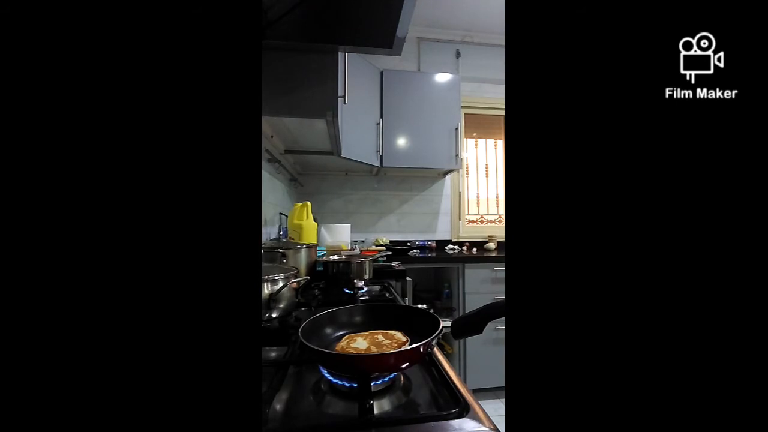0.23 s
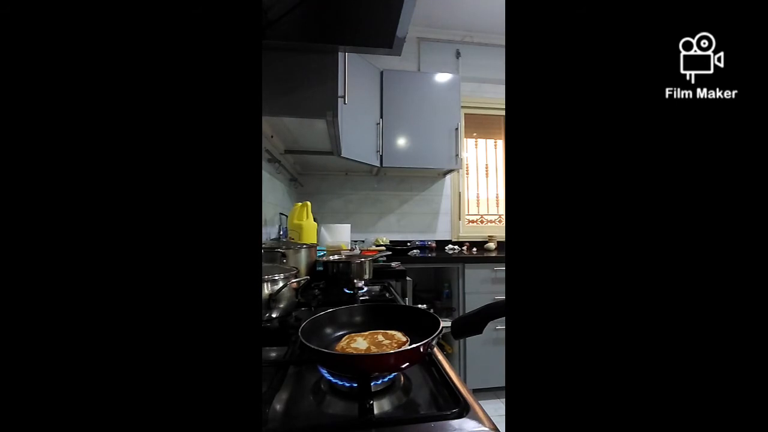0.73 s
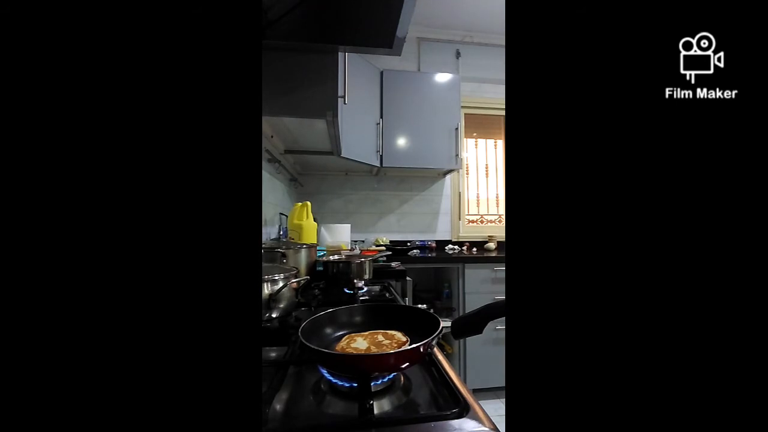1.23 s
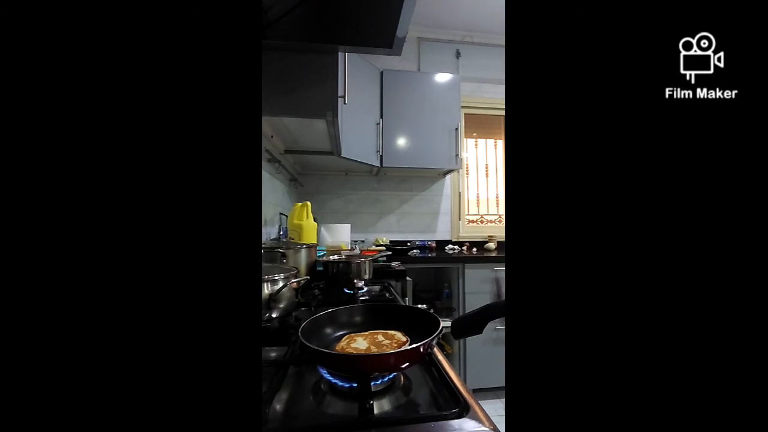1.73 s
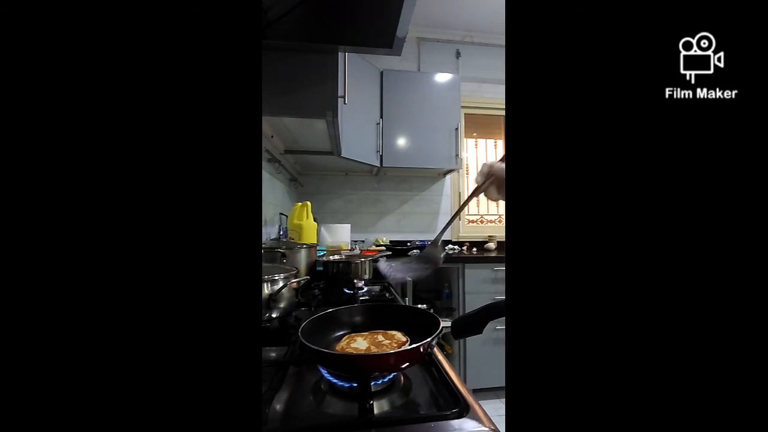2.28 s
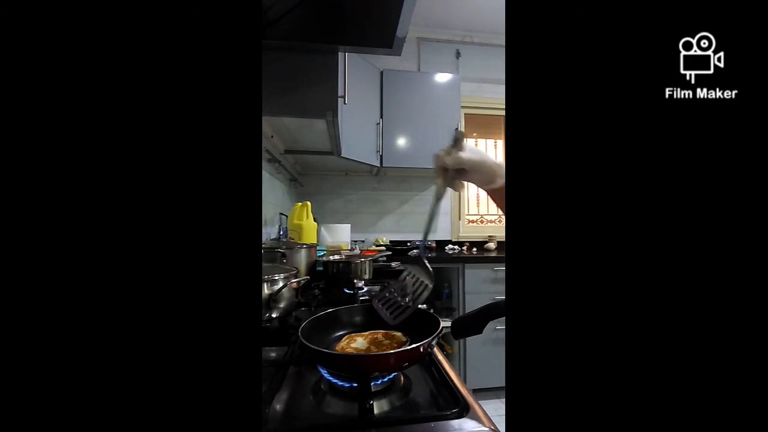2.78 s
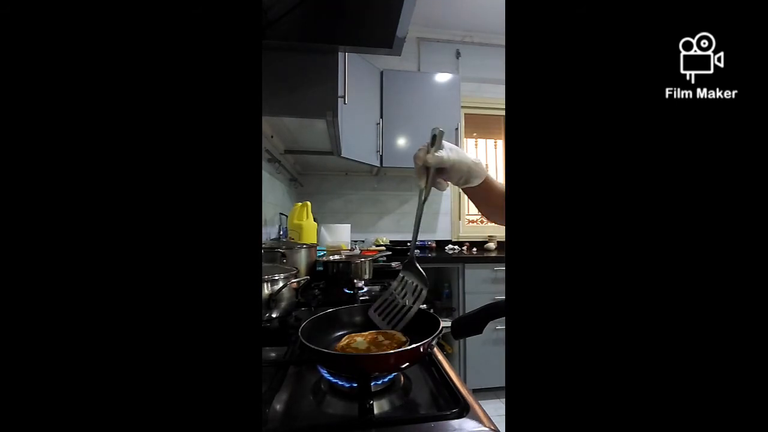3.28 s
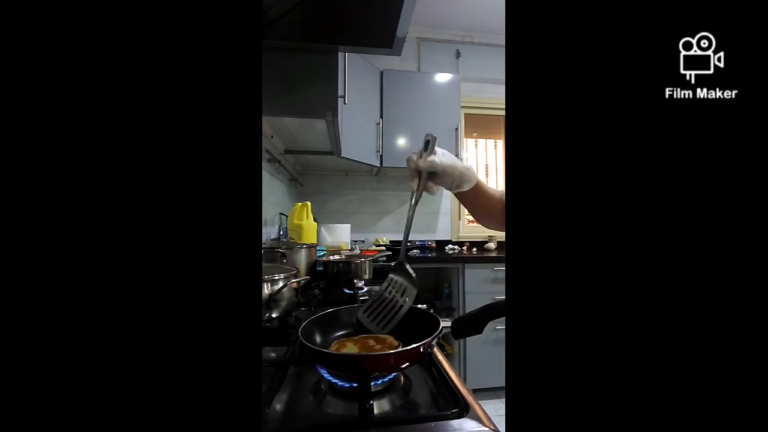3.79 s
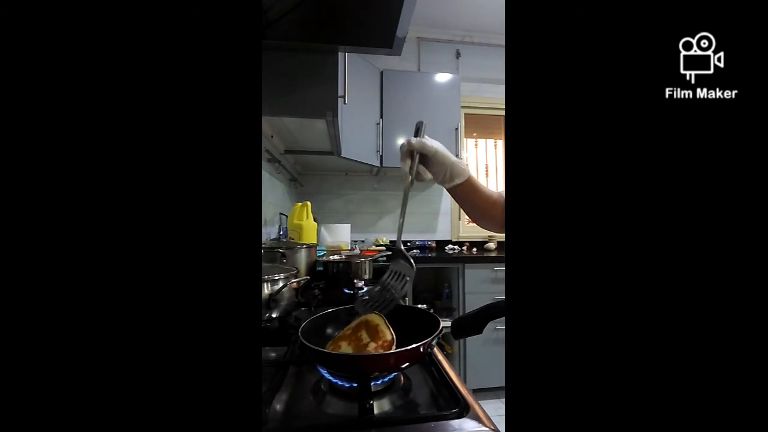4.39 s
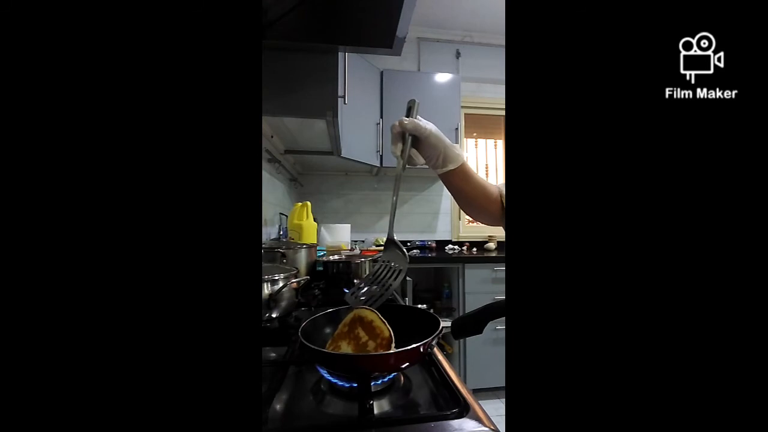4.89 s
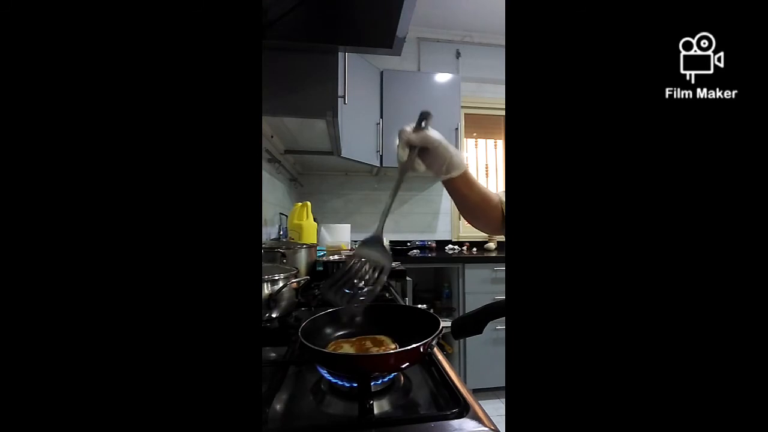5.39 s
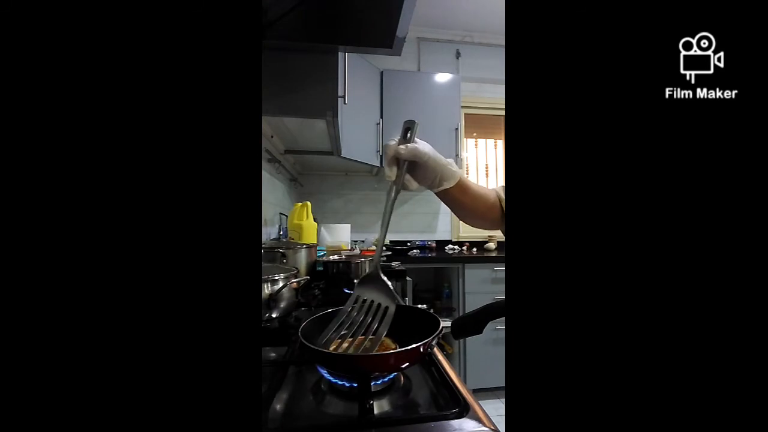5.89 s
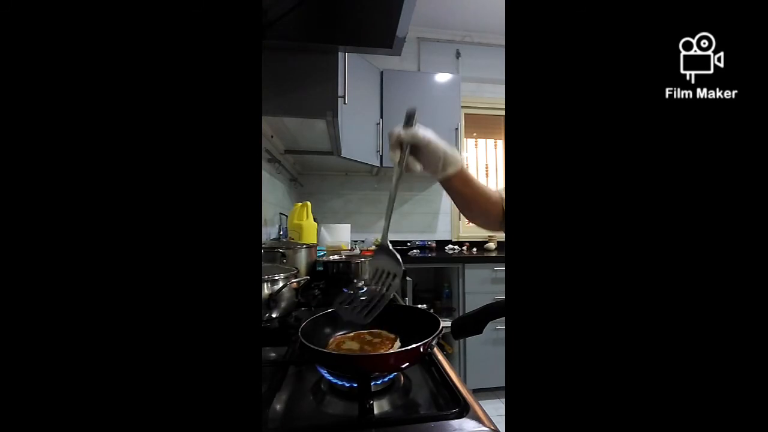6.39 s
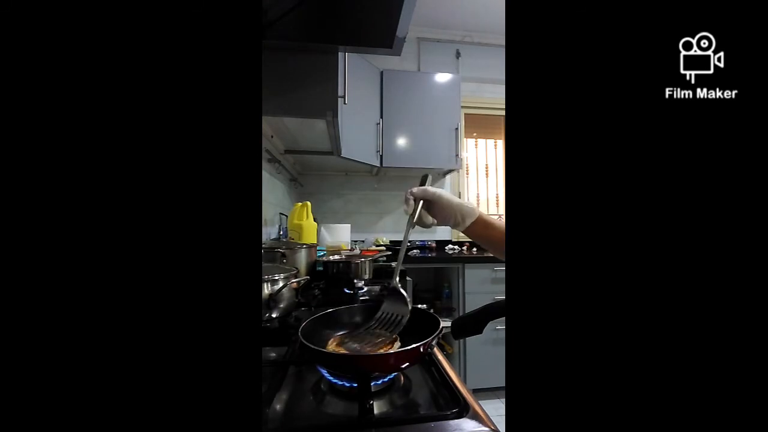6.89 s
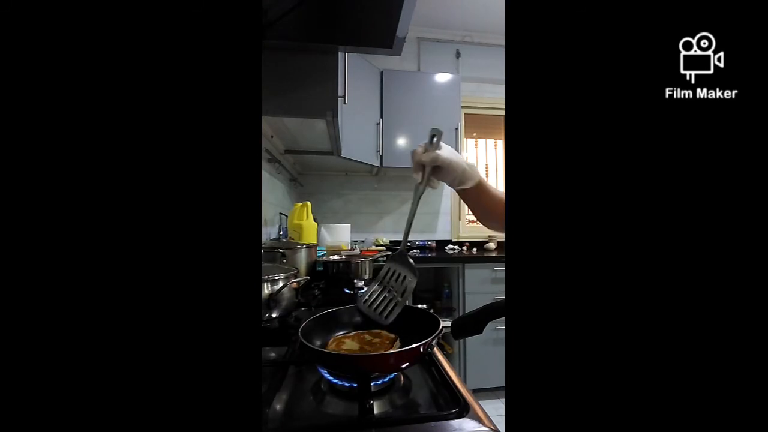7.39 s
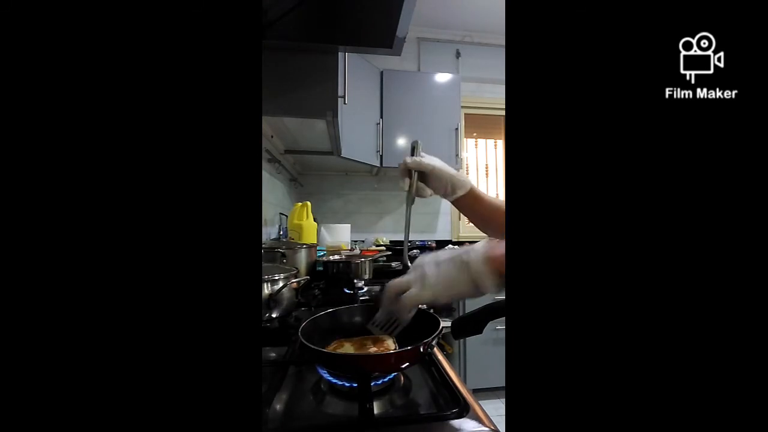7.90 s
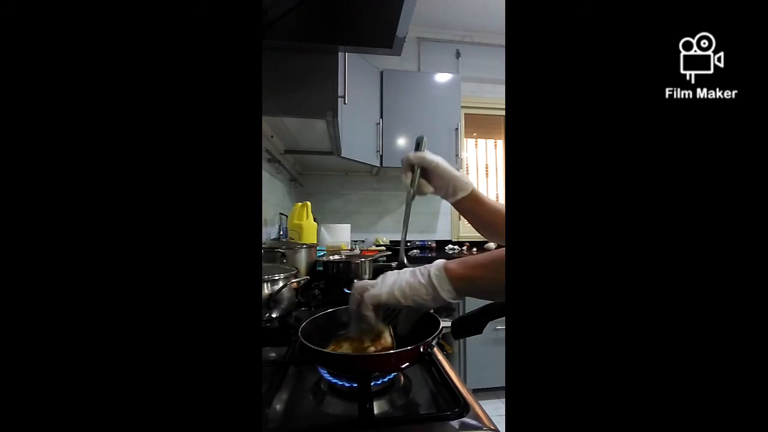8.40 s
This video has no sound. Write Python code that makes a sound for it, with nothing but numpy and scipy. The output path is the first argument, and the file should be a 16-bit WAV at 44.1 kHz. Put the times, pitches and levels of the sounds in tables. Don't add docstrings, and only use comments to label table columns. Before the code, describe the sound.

A tiny tick opens onto a steady low extractor hood roar, bass-heavy and gently gusting, with a soft airy rush and a very faint, fluctuating fat hiss. The place is a small, hard kitchen, heard close in stereo. At about 2.6 s a steel turner taps the frying pan firmly and scrapes, with lighter metallic ticks to 2.9. Light taps and a drag follow at 3.2, then a hard, quickly damped knock at 3.85 with short scrapes to 4.1. From 4.53 to 5.09 everything drops to complete silence, then the roar returns abruptly with a tiny tick and a faint scrape. A clean slap hits the pan rim at 5.9. The sizzle dips after 6.5; a barely audible tap comes at 6.9. Around 7.5 a hard knock leads into several scratchy drags, fading by 8.3, while a thin plastic glove rustles softly in squeezes until the end at 8.6.

```python
import sys
import numpy as np
from scipy import signal
from scipy.fft import rfft, irfft
from scipy.io import wavfile
from scipy.ndimage import uniform_filter1d

SR = 44100
rng = np.random.default_rng(int(sys.argv[2]) if len(sys.argv) > 2 else 0)


def elevation(decibels):
    levels = np.asarray(decibels, float)
    return 10 ** (levels / 20)


def to_wav(sig):
    pcm = np.clip(np.atleast_2d(sig), -1, 1) * 32767
    pcm = np.round(pcm).astype(np.int16)
    wavfile.write(sys.argv[1], SR, pcm.T)


N = 380583
T = np.arange(N) / SR
HZ = np.arange(N // 2 + 1) * SR / N

# frequency in Hz, width in Hz, level in dB per Hz.
DUCT_MODES = [(61.3, 12, -55.5), (90.5, 32, -57.5), (114.8, 23.7, -47), (136, 24.9, -46),
              (202.5, 11, -56.5), (253, 53, -55), (299.9, 22.6, -53.5), (336, 29, -64.5), (396.4, 52, -62),
              (423.6, 37, -59.5), (466.8, 43.3, -57.5), (500.4, 21, -60), (526, 20, -64.5),
              (579, 57, -65.5), (620.7, 16, -63.0), (654, 29, -71), (700.4, 48, -67), (794.7, 31, -67.5),
              (790, 11, -85), (1040, 4.1, -78.5), (1031, 16, -74.5), (1050, 5.2, -71.5)]
# frequency in Hz, width in Hz, level in dB per Hz.
SLOT_WHISTLES = [(1537, 100, -82), (2291, 83, -81.5), (2410, 57, -84.5), (3320, 120, -89.5),
                 (3570, 140, -88.5), (4080, 100, -96.5)]
# frequency in Hz, level in dB per Hz.
AIR_RUSH = [(25, -99), (45, -86.5), (800, -79), (1050, -77.5), (1300, -81.5), (1550, -86), (1900, -87),
            (2300, -87.5), (2800, -91.5), (3400, -93), (4100, -94), (4700, -108), (6000, -120)]
# frequency in Hz, level in dB rms.
MOTOR_BUZZ = [(200.3, -47)]
# centre in seconds, rise over the lull in dB.
GUST_SWELLS = [
    (.15, 1),
    (1.1, 6),
    (2.2, 4.5),
    (3.4, 3.5),
    (4.2, 2.5),
    (5.3, 2.5),
    (5.85, 4),
    (7.1, 4),
    (7.8, 5),
    (8.6, 2.5),
]

# frequency in Hz, level in dB.
FAT_SPECTRUM = [(3800, 1.5), (4900, 2), (5400, 1.5), (6200, 1.5), (7600, -4.5), (8200, -5), (9000, -7.5),
                (12000, -16.5), (15700, -22)]
# time in seconds, level in dB.
FAT_HEAT = [
    (0, -76.5),
    (1.5, -80),
    (2.6, -78),
    (4.5, -80.5),
    (6.2, -77.5),
    (6.6, -83.5),
    (7.3, -83),
    (8.63, -80.5),
]
# centre in seconds, rise over the simmer in dB.
FAT_SWELLS = [(.22, 3), (.41, 4.5), (.68, 6), (1.07, 5.5), (1.22, 3.5), (1.61, 4.5), (1.87, 2.5),
              (2.1, 1.5), (2.67, 5.5), (3.2, 6.5), (3.35, 3.5), (3.58, 3), (3.9, 6.5), (4.26, 4), (4.52, 5),
              (5.12, 5), (5.42, 4), (5.98, 3.5), (6.25, 0.5)]

# frequency in Hz, level in dB.
GLOVE_SPECTRUM = [(1200, -1.5), (1900, -6), (2700, -3.5), (3300, -3), (4200, -8), (5100, -11.5),
                  (6000, -10.5), (7300, -15), (8200, -16), (9300, -20.5), (13500, -27.5), (15600, -26)]
# centre in seconds, rise in dB.
GLOVE_SQUEEZES = [
    (7.65, 1),
    (7.82, 1.5),
    (7.95, 3.5),
    (8.1, 3.5),
    (8.33, 4),
    (8.62, 2),
]

# start in seconds, pan level in dB, bowl minus rim in dB, blade minus pan in dB.
TURNER_TAPS = [
    (2.564, -38.5, 6, -13),
    (2.678, -48.5, -3, 1),
    (2.848, -49, -5, 4.5),
    (3.150, -53.5, -3, -3.5),
    (3.180, -46.5, -5.5, -1.5),
    (3.729, -49, 3, -8.5),
    (3.855, -33, -1, -8),
    (6.86, -58, 3.5, -3.5),
    (7.466, -51.5, 5, -3),
    (7.548, -35, 1, -5),
]
# start in seconds, pan level in dB, bowl minus rim in dB, blade minus pan in dB.
BLADE_SLAPS = [
    (5.872, -31.5, -12, -37),
]
# start in seconds, pan level in dB, bowl minus rim in dB, blade minus pan in dB,
# contact time in seconds.
TURNER_DRAGS = [(2.572, -39.5, -1.5, -11, .035), (2.857, -61, 2, 2.5, .018), (3.191, -43, 0.5, -18.5, .03),
                (3.745, -47.5, 8.5, -19.5, .02), (3.875, -48, -9, -15, .02), (4.027, -48, -16, -22, .041),
                (5.195, -58, 1, -0.5, .033), (5.880, -37, -6, -31.5, 0.012),
                (5.905, -48, -1.5, -26.5, 0.012), (7.478, -44.5, 3, -16.5, 0.02),
                (7.558, -36, -4.5, -22.5, 0.02), (7.595, -43, 0.5, -14, .03), (7.668, -40, -3.5, -16, .088),
                (7.915, -47, 1, -9.5, .037), (8.270, -44, -11.5, -14, .015)]

# frequency in Hz, level in dB, 60 dB decay time in seconds.
BOWL_MODES = [(685, -8.5, .05), (755, -6.5, 0.09), (870, -7, 0.045), (974, 0.5, 0.058), (1107, -2, 0.035),
              (1186, -4.5, 0.011), (990, 5, 0.0033)]
# frequency in Hz, level in dB, 60 dB decay time in seconds.
RIM_MODES = [(1442, 0.5, 0.037), (1580, -0.5, 0.029), (1290, -8.5, .015), (1720, -8.5, .02),
             (1960, -7, 0.018), (1820, -2, 0.002)]
# frequency in Hz, level in dB, 60 dB decay time in seconds.
LIP_MODES = [(2040, -2, 0.013), (2390, 1.5, 0.05), (2550, 1, 0.039), (2790, -5, .015), (3280, -4, 0.022),
             (3610, -6, 0.024), (4270, -5.5, 0.018), (2680, 4, 0.0021)]
# frequency in Hz, level in dB, 60 dB decay time in seconds.
BLADE_MODES = [(5000, -4, .005), (5650, -2, .010), (5960, -3.5, .012), (6760, -4, .005), (7600, -4, .006),
               (8750, -6, .005), (10600, -10, 0.0044)]
# frequency in Hz, level in dB, 60 dB decay time in seconds.
EDGE_MODES = [(9300, -2, .002), (10800, -1, .002), (12000, 0, .002), (13600, -4, .002), (15200, -6, .002)]

# frequency in Hz, left minus right in dB.
PORT_BALANCE = [(200, 1.), (310, 4), (400, -0.5), (560, 4.5), (720, 11.5), (940, 1), (1120, 6.5), (1320, 4),
                (1700, 8.5), (2600, 5), (3500, 11), (4800, -2.5), (7000, -1), (8300, -0.5)]
# frequency in Hz, likeness from 0 to 1.
PORT_LIKENESS = [(200, 1), (350, 0.95), (480, 0.95), (650, .88), (900, 0.82), (1070, 1), (1250, 0.67),
                 (1700, .15), (2350, 0.5), (2700, 0.25), (5000, 0.18)]
# frequency in Hz, lag of the left in radians.
PORT_LAG = [(200, -0.13), (550, -0.06), (800, 1), (920, 1), (1100, 1.68), (1300, 2), (1900, 4.5),
            (2350, 7.5), (4000, -4.5)]

# its start in seconds, its end in seconds.
SILENCE_S = (4.5345, 5.091)


def on_hz(table):
    hz, value = np.transpose(table)
    return np.interp(np.log(HZ + 1), np.log(hz), value)


def on_time(table):
    return np.interp(T, *np.transpose(table))


def swells(events, width_s):
    return sum(db * np.exp(-((T - s) / width_s) ** 2) for s, db in events)


def flicker(rate_hz):
    hold = int(SR / rate_hz)
    steps = np.repeat(rng.standard_normal(N // hold + 1), hold)
    return uniform_filter1d(steps, hold)[:N]


def grains(spread_db):
    noise = rng.standard_normal(N) * elevation(spread_db * rng.exponential(size=N))
    return noise / noise.std()


def ports(near, far):
    apart = np.clip((HZ - 150) / 100, .1, 1)
    like = 1 - apart * (1 - np.clip(on_hz(PORT_LIKENESS), 0, 1))
    shifted = near * np.exp(1j * apart * on_hz(PORT_LAG))
    right = like * shifted + np.sqrt(1 - like ** 2) * far
    tilt = elevation(apart * on_hz(PORT_BALANCE) / 2)
    return irfft(np.array([near * tilt, right / tilt]), N)


def hiss(colour, source, envelope):
    gain = elevation(on_hz(colour)) * (HZ > colour[0][0] * .7)
    treble = (HZ > 5500) & (HZ < 14000)
    gain /= np.sqrt(np.sum(gain[treble] ** 2) / len(HZ))
    return ports(gain * rfft(source()), gain * rfft(source())) * envelope


def ring(force, modes):
    out = 0
    for k, (hz, db, t60_s) in enumerate(modes):
        pole = np.exp(2j * np.pi * hz / SR - np.log(1000) / (t60_s * SR))
        out = out + (-1) ** k * elevation(db) * signal.lfilter([1], [1, -pole], force).imag
    return out


def port_noise():
    return elevation(-88.5) * rng.standard_normal((2, N))


def hood():
    effort_db, lull_db, gust_s = -0.31, -2, .2
    power = elevation(on_hz(AIR_RUSH)) ** 2
    for hz, width_hz, db in DUCT_MODES + SLOT_WHISTLES:
        power = power + elevation(db) ** 2 / (1 + (2 * (HZ - hz) / width_hz) ** 2) ** 2
    gain = np.sqrt(power * SR / 2) / (1 + (30 / (HZ + 1)) ** 4)
    near = gain * rfft(rng.standard_normal(N))
    far = gain * rfft(rng.standard_normal(N))
    buzz = 0
    for hz, db in MOTOR_BUZZ:
        buzz = buzz + np.sqrt(2) * elevation(db + 1.0 * flicker(6.6)) * np.sin(2 * np.pi * hz * T)
    deep = irfft(near / (1 + (HZ / 175) ** 8), N)
    buffet = elevation(lull_db + swells(GUST_SWELLS, gust_s)) - 1
    return (ports(near + rfft(buzz), far) + buffet * deep) * elevation(effort_db)


def fat():
    seethe_s = .07
    level_db = on_time(FAT_HEAT) + swells(FAT_SWELLS, seethe_s) + 3.0 + 1.0 * flicker(22)
    return hiss(FAT_SPECTRUM, lambda: grains(2.1), elevation(level_db))


def glove():
    start_s, attack_s, level_db, squeeze_s = 7.55, .1, -66.5, 0.078
    flutter = elevation(1.1 * flicker(30))
    onset = np.clip((T - start_s) / attack_s, 0, 1)
    grip = onset * elevation(level_db + swells(GLOVE_SQUEEZES, squeeze_s))
    return hiss(GLOVE_SPECTRUM, lambda: grains(2.3), grip * elevation(3.5) * flutter)


def contact(force, grit, event, tick, rub, square, lip_db):
    start_s, pan_db, place_db, blade_db, contact_s = event
    parts_db = pan_db + np.array([blade_db, place_db / 2, -place_db / 2, lip_db])
    edge_db = -1 + min(parts_db[0], -50)
    parts_db = np.append(parts_db, edge_db)
    start = int(start_s * SR)
    age = np.arange(int(4 * contact_s * SR)) / SR
    span = slice(start, start + len(age))
    touch = grit[:, span] * np.exp(-(age / contact_s) ** square)
    touch *= rub * np.sqrt(contact_s / 0.011 / np.sum(touch ** 2, axis=1, keepdims=True))
    touch[:, 0] += tick
    force[:, span] += elevation(parts_db)[:, None] * touch[[0, 1, 2, 3, 1]]


def walls(struck):
    t60_s, room_db, right_late_s = .15, -5, 0.000615
    age = np.arange(int(.4 * SR)) / SR
    tails = rng.standard_normal((2, len(age))) * np.exp(-np.log(1000) * age / t60_s)
    tails *= np.clip(age / 0.0067, 0, 1)
    tails *= elevation(room_db) / np.sqrt(np.sum(tails ** 2, axis=1, keepdims=True))
    tails[:, 0] = 1
    left, right = rfft(struck) * rfft(tails, N)
    tilt = elevation(on_hz(PORT_BALANCE) / 2)
    delay = np.exp(-2j * np.pi * HZ * right_late_s)
    return irfft(np.array([left * tilt, right / tilt * delay]), N)


def turner():
    grit_per_s, grit_spread_db, tap_s = 4600, 1.5, 0.0099
    force = np.zeros((5, N))
    size = elevation(grit_spread_db * rng.exponential(size=(4, N)))
    hits = rng.random(N) < grit_per_s / SR
    grit = hits * rng.standard_normal((4, N)) * size
    for row in TURNER_TAPS:
        contact(force, grit, (*row, tap_s), tick=.85, rub=.8, square=1, lip_db=-1.5)
    for row in BLADE_SLAPS:
        contact(force, grit, (*row, tap_s), tick=1.1, rub=.25, square=1, lip_db=-8)
    for row in TURNER_DRAGS:
        contact(force, grit, row, tick=.05, rub=1.1, square=4, lip_db=-3.5)
    struck = elevation(2.0) * ring(force[0], BLADE_MODES)
    struck += elevation(6.0) * ring(force[1], BOWL_MODES)
    struck += elevation(-1.5) * ring(force[2], RIM_MODES)
    struck += elevation(-1.0) * ring(force[3], LIP_MODES)
    struck += ring(force[4], EDGE_MODES)
    return walls(struck)


def scene():
    return port_noise() + hood() + fat() + glove() + turner()


def top_cut(x):
    return signal.sosfilt(signal.butter(12, 15770, fs=SR, output="sos"), x)


def record(dry):
    fade_out = np.clip((SILENCE_S[0] - T) / .0006, 0, 1)
    fade_in = np.clip((T - SILENCE_S[1]) / 0.0025, 0, 1)
    join_tick = elevation(-45) * (np.arange(N) == int(5.1154 * SR))
    start_tick = elevation(-27) * (np.arange(N) < 2)
    return top_cut(dry * (fade_out + fade_in) + join_tick + start_tick)


dry = scene()
out = record(dry)
to_wav(out)
```